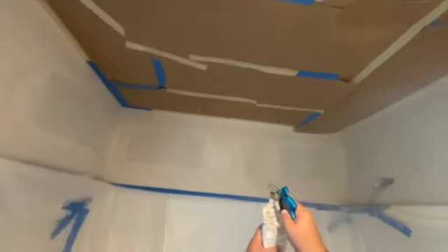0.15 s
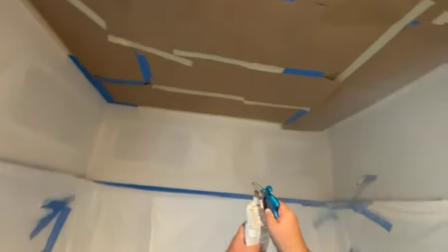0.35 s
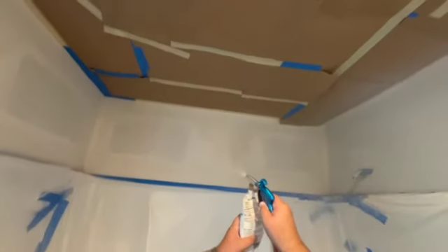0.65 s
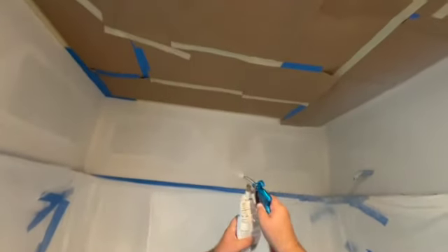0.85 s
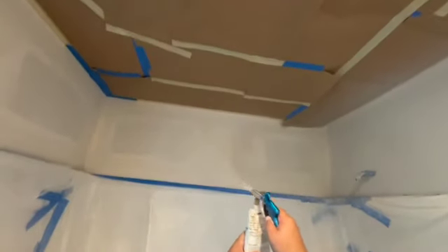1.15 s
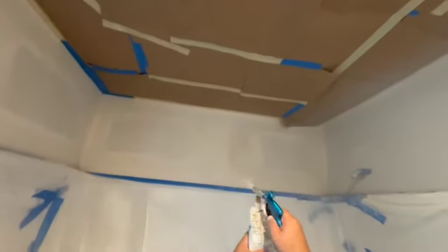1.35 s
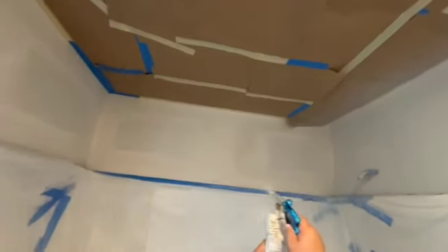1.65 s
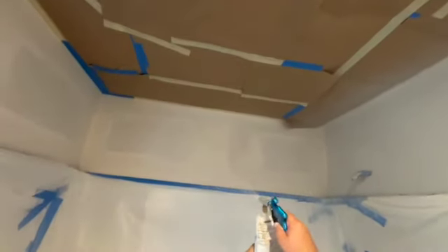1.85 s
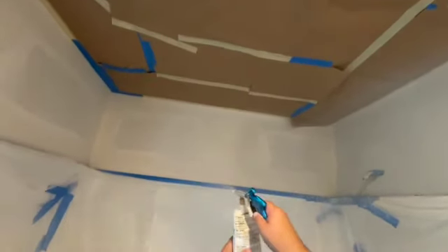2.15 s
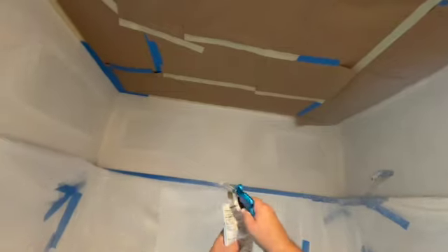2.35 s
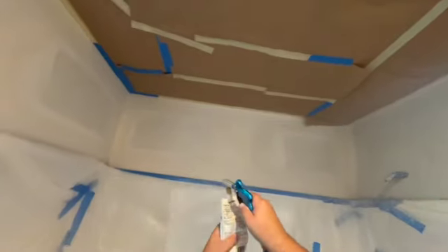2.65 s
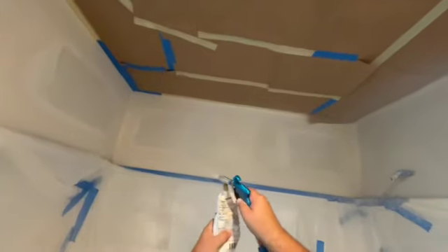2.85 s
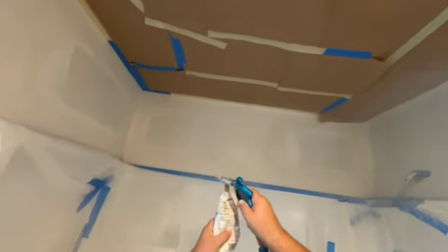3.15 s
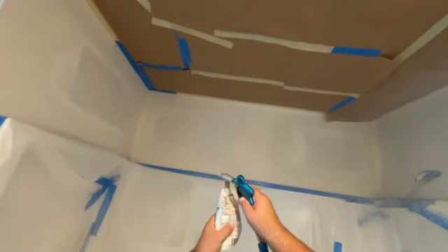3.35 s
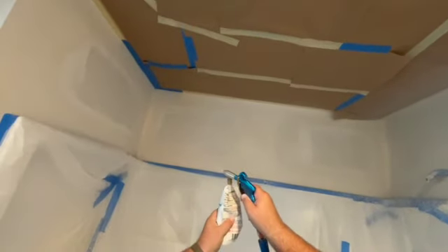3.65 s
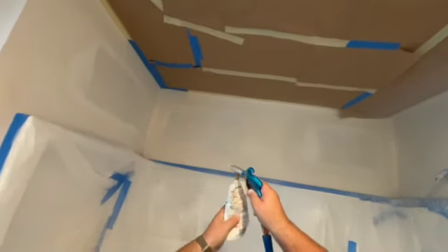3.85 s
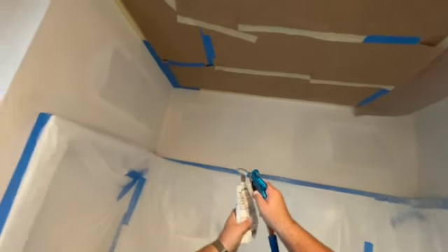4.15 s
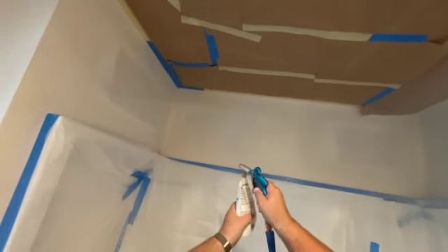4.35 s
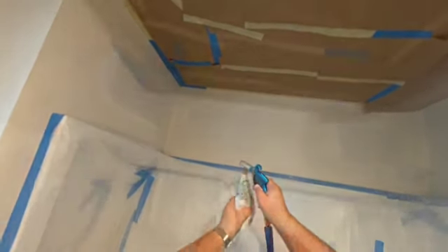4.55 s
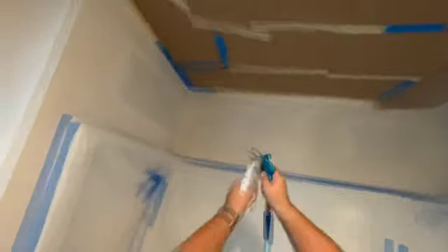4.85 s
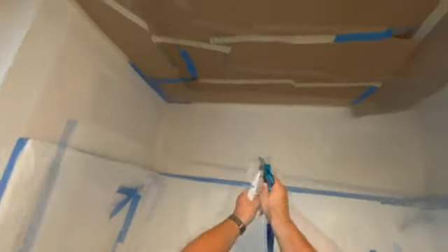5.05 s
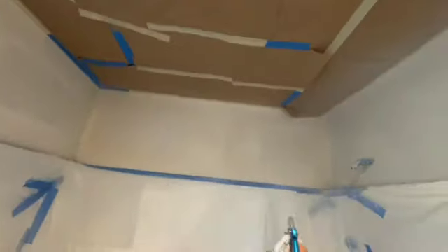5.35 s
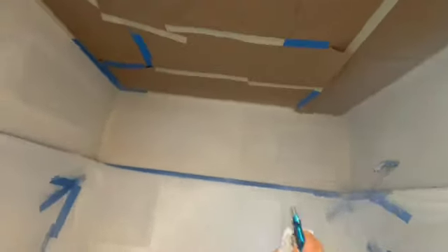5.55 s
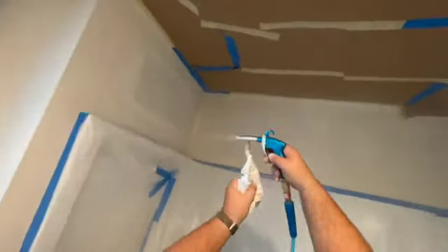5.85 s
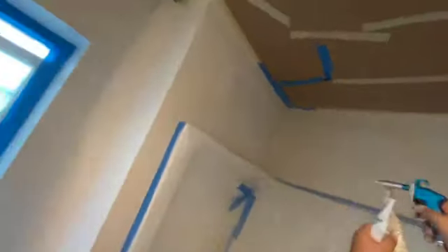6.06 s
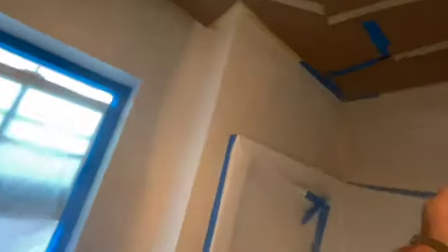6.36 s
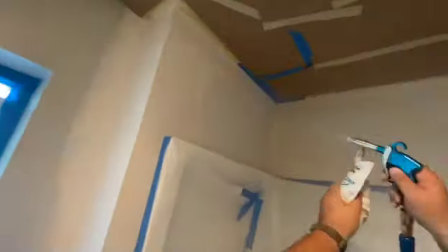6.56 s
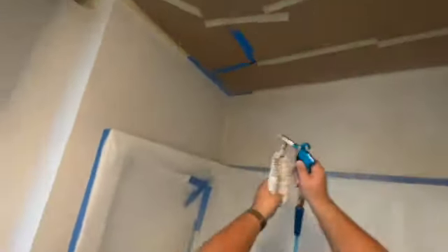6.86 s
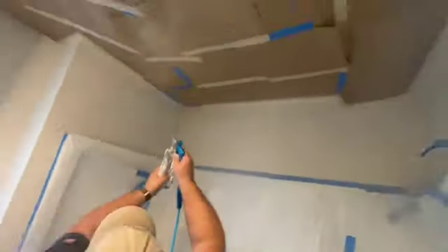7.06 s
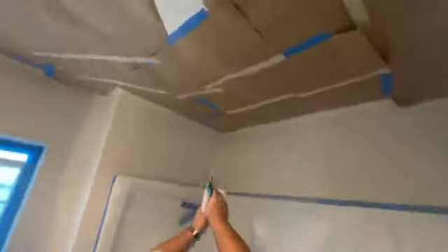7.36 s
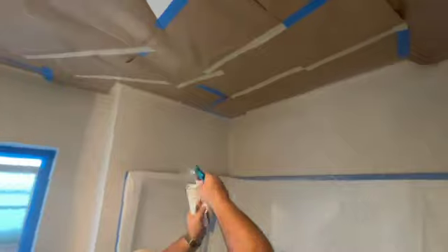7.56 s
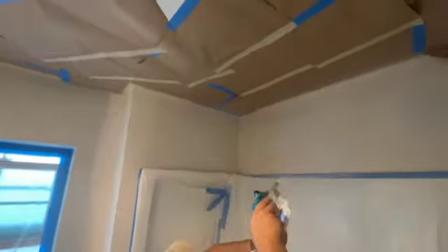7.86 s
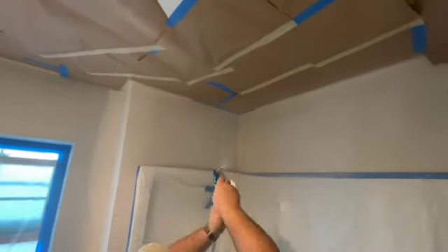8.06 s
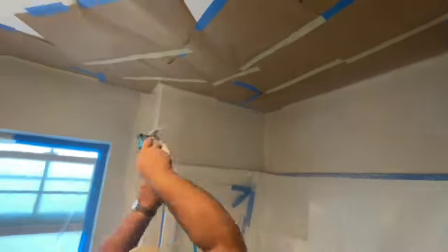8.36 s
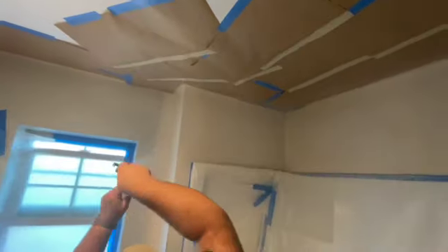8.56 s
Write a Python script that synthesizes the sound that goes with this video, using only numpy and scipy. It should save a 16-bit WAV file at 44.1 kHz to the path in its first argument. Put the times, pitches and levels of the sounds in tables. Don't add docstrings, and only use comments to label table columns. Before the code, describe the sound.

A low throbbing compressor is heard first, with a slight air leak. A spray gun then bursts open close to the microphone, roaring with broad turbulent hiss, fluttering, ringing and crackling with little wet spits. It slowly weakens, then dissolves into a soft time-lapse version: bright airy hiss broken by short pauses over a faint steady whine, which largely stops before the end. Small hard indoor space, wide stereo, automatic level control.

```python
import sys
import numpy as np
from scipy import signal
from scipy.fft import rfft, irfft
from scipy.io import wavfile
from scipy.ndimage import uniform_filter1d

SR = 44100
rng = np.random.default_rng(int(sys.argv[2]) if len(sys.argv) > 2 else 0)


def store_wav(level_fs):
    pcm = np.round(np.clip(np.atleast_2d(level_fs), -1, 1) * 32767)
    wavfile.write(sys.argv[1], SR, pcm.T.astype(np.int16))


def how_loud(loudness_db):
    steps = np.asarray(loudness_db, float) / 20
    return 10 ** steps


N = 384111
HOP, SIZE = 512, 2048
HZ = np.fft.rfftfreq(SIZE, 1 / SR)[:, None]
PASSAGE_SAMPLES = round(5.3 * SR)
S = np.arange(PASSAGE_SAMPLES) / SR
FRAME_S = np.arange(PASSAGE_SAMPLES // HOP + 5) * HOP / SR
TRIGGER_S, FAST_START_S = 0.572, 4.5


def evened(x):
    return x / np.sqrt(np.mean(abs(x) ** 2) + 1e-20)


def wander(count, size):
    return evened(uniform_filter1d(rng.standard_normal(count), size=size))


def drift(size):
    field = rng.standard_normal((len(FRAME_S), len(HZ))).T
    return evened(uniform_filter1d(uniform_filter1d(field, size[0], 0), size[1], 1))


def ramp(t, start, length):
    return np.clip((t - start) / length, 0, 1)


def bumps(rows, t):
    return sum(db * np.exp(-((t - s) / width) ** 2) for s, db, width in rows)


def within(spans, t, margin=0):
    return sum((t > start + margin) & (t < end - margin) for start, end in spans) > 0


def read(points, hz):
    f, value = np.transpose(points)
    return np.interp(np.log(hz + 1), np.log(f + 1), value)


def streaks(depth_db, size):
    gain = how_loud(depth_db * np.minimum(drift(size=size), 1.3))
    return gain / np.sqrt(uniform_filter1d(gain ** 2, size=14, axis=0))


def hiss(mid, side, band_hz, shape_db, side_db, lean, link, streak_db, patch_db, gust_db, tilt_db,
         mid_db=0, size=(2, 26)):
    a, b, c, d = rng.standard_normal((len(FRAME_S), len(HZ), 4)).T
    inside = (HZ > band_hz[0]) & (HZ < band_hz[1])
    mid_gain, side_gain = (how_loud(read(p, HZ)) * (HZ < 15870) for p in (mid, side))
    mid_gain, side_gain = (g / np.sqrt((g[inside] ** 2).sum()) for g in (mid_gain, side_gain))

    tie = lean + link * np.exp(2.5j * drift(size=(4, 140)))
    tie = tie / np.maximum(abs(tie), 1)
    m = a + 1j * b
    s = tie * m + np.sqrt(abs(1 - abs(tie) ** 2)) * (c + 1j * d)

    above_bass = HZ / (HZ + 900)
    gust = gust_db * wander(len(FRAME_S), 2)
    tilt = tilt_db * above_bass * drift(size=(9, 14))
    m = m * mid_gain * how_loud(mid_db + tilt) * streaks(streak_db, size)
    s = s * side_gain * how_loud(side_db - tilt) * streaks(streak_db, size)
    changes_db = above_bass * (gust + patch_db * drift(size=(14, 4)))
    z = np.array([m + s, m - s]) * how_loud(shape_db + changes_db)
    sound = signal.istft(z, nperseg=SIZE, noverlap=SIZE - HOP)[1]
    return sound[:, :len(S)] * np.sqrt(1.5)


def resonate(x, hz, width):
    f = np.fft.rfftfreq(len(x), 1 / SR)
    return evened(irfft(rfft(x) / (1 + (2 * (f - hz) / width) ** 2), len(x)))


def tone(hz, lean_db):
    wave = np.sqrt(2) * np.sin(2 * np.pi * (hz * S + rng.random()))
    return wave * how_loud(np.array([[lean_db], [-lean_db]]))


def ring_db(rings, t):
    lift = 0
    for start, end, hz0, hz1, width, db in rings:
        on = np.clip(np.minimum(t - start, end - t) / 0.07, 0, 1)
        on = on * np.clip(1 + 0.23 * wander(len(t), 6), 0, 2)
        hz = np.interp(t, [start, end], [hz0, hz1])
        lift = lift + db * on / (1 + ((HZ - hz) / width) ** 2)
    return lift


# (f / stroke rate [ratio], level/dB, lean to the left/dB)
PUMP_LINES = [(1, -2, 1.5), (1.5, -18, 7), (1.999, -27, -7), (2.255, -14, -5), (3.25, -27, 6),
              (3.998, -6.5, -2), (5.499, -14.5, -5), (8.25, -18.5, -7)]
# (f/Hz, level/dB per Hz)
PUMP_MID = [(35, -22), (67, -19), (161, -17), (217, 0), (339, -5), (449, -10.5), (600, -12), (815, -17),
            (1000, -13), (2000, -29.5), (3500, -35), (8000, -60), (12500, -65)]
# (f/Hz, level/dB per Hz)
PUMP_SIDE = [(21, -32), (35, -4), (59, 4), (81, -13), (120, 0), (174, -5), (213, -11), (257, -13),
             (441, -8), (728, -10), (3000, -30), (3900, -52), (6600, -120)]
# (f/Hz, width/Hz, level/dB)
ROOM_MODES = [(97.5, 31, -14.5), (208, 27, -16), (245, 33, -15), (284, 22, -12.5), (374, 25, -23),
              (436, 22, -17)]


def compressor():
    stroke_hz = 53.1
    level_db = -32 - 7 * (1 - ramp(S, 0, 0.012))
    level_db = level_db - 18.5 * ramp(S, 0.584, 0.084)
    level_db = level_db - 4 * ramp(S, 1.3, 0.2)
    lines = sum(how_loud(db) * tone(k * stroke_hz, lean_db) for k, db, lean_db in PUMP_LINES)

    stroke = np.cos(2 * np.pi * stroke_hz * S)
    noise = rng.standard_normal(len(S))
    modes = sum(how_loud(db) * resonate(noise, f, w) for f, w, db in ROOM_MODES)
    modes = modes * (1 + 0.3 * stroke) * how_loud([[-1.5], [1.5]])
    rattle = hiss(PUMP_MID, PUMP_SIDE, (60, 3000), shape_db=0, side_db=-2, lean=-0.1, link=0.75,
                  streak_db=0.87, patch_db=0.7, gust_db=0.39, tilt_db=1.4)
    rattle = how_loud(-9.0) * (1 + 0.16 * stroke) * rattle
    return how_loud(level_db) * (lines + modes + rattle)


# (f/Hz, level before 6.9 s/dB, change/dB per s, level after 7.16 s/dB)
WHINE_LINES = [(366.1, -62, 2.5, -78), (829, -69.5, -1.5, -66), (1464, -64.5, 0.2, -67),
               (2024, -75, -1, -90)]
# (f/Hz, level re that whine/dB)
HUM_SIDEBANDS = [(543.7, -7), (636.9, -9), (732.1, -7.5), (1560, -20), (1655, -20), (1739, -9)]


def hurried_compressor():
    shifted = ramp(S + FAST_START_S, 6.9, 0.26)
    levels = []
    for _, db, db_per_s, late_db in WHINE_LINES:
        early_db = db + db_per_s * (S - 0.8)
        levels.append(early_db * (1 - shifted) + late_db * shifted)
    whine = sum(how_loud(db) * tone(line[0], 1.0) for line, db in zip(WHINE_LINES, levels))
    sidebands = sum(how_loud(levels[1] + db) * tone(hz, 0.3) for hz, db in HUM_SIDEBANDS)
    return (whine + sidebands) * np.sqrt(ramp(S, 0.05, 0.5))


# (f/Hz, level/dB per Hz)
FAST_MID = [(24, -41), (40, -8.5), (763, -7), (823, -6.5), (1200, -8.5), (1460, -5), (1580, -6), (2730, -9),
            (3170, -5.5), (5360, -3), (6550, -0.5), (9290, 0), (11300, -2), (13500, 0.5), (15700, -1)]
# (f/Hz, level/dB per Hz)
FAST_SIDE = [(24, -44), (40, -11), (154, -10.5), (823, -9), (1230, -11), (1500, -9.5), (3590, -6),
             (3870, -3), (4180, -4), (4500, -4), (5920, -0.5), (11900, 2), (15700, -2.5)]
# (start t/s, end t/s, start f/Hz, end f/Hz, width/Hz, lift level/dB)
FAST_RINGS = [(4.5, 6.75, 2030, 2000, 85, 4.5), (5.1, 5.9, 5450, 5400, 250, -4.5),
              (5.15, 5.5, 10300, 10300, 300, -5), (5.9, 6.55, 5350, 5350, 220, -14),
              (6.1, 6.5, 11000, 10500, 700, -4), (6.72, 6.88, 10900, 10900, 450, -15),
              (7.0, 7.4, 12300, 11300, 500, -7), (7.45, 7.7, 11100, 11600, 500, -14),
              (7.68, 7.89, 7050, 7200, 200, -22), (8.04, 8.17, 11100, 11100, 500, -20),
              (8.18, 8.27, 11500, 11500, 350, -22), (7.98, 8.09, 7400, 7300, 250, -18),
              (7.68, 7.88, 8800, 8800, 120, -14), (7.7, 7.85, 12900, 12700, 150, -14),
              (7.9, 8.08, 4800, 4800, 200, -8), (8.55, 9, 10900, 10900, 300, -16),
              (7.2, 7.55, 7450, 7450, 150, -6)]
# (t/s, change of flow level/dB, half-width/s)
LULLS = [(5.95, -0.5, 0.16), (6.4, -1.5, 0.14), (6.82, -1.5, 0.41), (7.07, -6, 0.13), (7.46, 1, .025),
         (7.68, 2, .04), (7.76, -0.5, .025), (8.13, 0.5, .025), (8.18, 0.5, .02), (8.31, -3, 0.061),
         (8.34, -2.5, .02), (8.46, -4, 0.067), (8.56, 0, .03)]


def hurried_jet():
    t = FRAME_S + FAST_START_S
    lull_db = bumps(LULLS, t)
    level_db = -40.5 + lull_db
    body_db = -12 - 0.7 * lull_db
    bass_db = -68.5 - level_db
    body = (body_db + 10.0) / (1 + (HZ / 4200) ** 4) / (1 + (600 / (HZ + 1)) ** 4)
    bass = (bass_db + 24.5) / (1 + (HZ / 600) ** 4)
    gaps = (HZ > 2900) & (drift(size=(7, 8)) > 1.25 + 0.45 * (HZ > 6000))
    centre_db = ring_db(FAST_RINGS, t) - 40 * gaps
    air = hiss(FAST_MID, FAST_SIDE, (4000, 15500), level_db + body + bass - 0.2, side_db=0.4, lean=0.16,
               link=0.82, streak_db=2.6, patch_db=1.0, gust_db=1.0, tilt_db=2.65, mid_db=centre_db,
               size=(2, 20))
    return air * ramp(S, 0.05, 0.73)


# (t/s, peak level/dB, length/s, loudest ring f/Hz)
SPITS = [(.579, -17, .018, 1300), (.915, -24, .012, 3100), (1.05, -21, .012, 1430),
         (1.116, -26, .014, 1430), (1.241, -24, .015, 1430), (2.04, -26, .02, 1430),
         (2.217, -29, .01, 1200), (2.417, -29, .01, 1200), (2.476, -27, .012, 1200),
         (2.512, -27, .012, 1200), (2.77, -29, .01, 1430), (2.835, -25, .014, 1200),
         (3.046, -29, .01, 1200), (3.133, -27, .012, 1200), (3.189, -27, .01, 2250),
         (3.213, -26, .012, 2250), (3.257, -26, .011, 1200), (3.285, -28, .01, 2250),
         (3.445, -26, .012, 2250), (3.498, -27, .012, 2250), (3.556, -29, .01, 2250),
         (3.688, -29, .01, 2250), (3.742, -29, .012, 2250), (3.81, -29, .008, 2250),
         (3.97, -27, .012, 2250), (4.031, -29, .01, 1430), (4.077, -27, .012, 2250),
         (4.098, -27, .02, 1430), (4.188, -28, .013, 1430), (4.247, -23, .01, 2250),
         (4.285, -28, .008, 2250), (4.3895, -21, .004, 3100), (4.477, -22.5, .012, 1430),
         (4.536, -19.5, .009, 1430), (4.6135, -21.5, .009, 1430), (4.56, -28, .01, 2250),
         (4.645, -27, .01, 3100), (4.706, -24, .011, 3100), (4.87, -31, .02, 1430), (4.94, -33, .02, 1430)]
# (f/Hz, width/Hz, level/dB)
SPIT_RINGS = [(1200, 130, -6), (1430, 200, -4.5), (2250, 260, -4), (3100, 500, -3)]


def spits():
    s, db, length, hz = np.transpose(SPITS)
    at = np.round(s * SR).astype(int)[:, None] + np.arange(6000)
    u = np.arange(6000) / SR / length[:, None]
    shape = how_loud(db[:, None] - 7.5) * np.minimum(u / 0.15, 1) * np.exp(-u)

    band = signal.butter(2, [1300, 5000], "band", fs=SR, output="sos")
    noise = rng.standard_normal((2, len(S)))
    parts = [(0, 0.38 * evened(signal.sosfilt(band, noise)))]
    for f, w, ring in SPIT_RINGS:
        parts.append((f, how_loud(ring) * np.array([resonate(x, f, w) for x in noise])))

    out = 0
    for f, part in parts:
        favour = how_loud(5 * (abs(hz - f) < 120))
        envelope = np.bincount(at.ravel(), (shape * favour[:, None]).ravel(), len(S))
        out = out + envelope[:len(S)] * part
    near, far = out
    return 0.59 * np.array([near + 0.69 * far, near - 0.5 * far])


# (t/s, level/dB, half-width/s)
LEAK_SWELL = [
    (.33, 3.5, 0.1),
]
# (t/s, change of flow level/dB, half-width/s)
SQUEEZES = [(.77, 2, .025), (.85, -4.5, 0.13), (.9, 1.5, .015), (1.0, 3.5, 0.04), (1.05, 4.5, 0.017),
            (1.33, 2, 0.13), (1.75, 0, 0.13), (2.06, 1, 0.021), (2.59, 0.5, 0.076), (4.14, 2.5, 0.13),
            (4.33, -1.5, 0.053), (4.45, 0.3, 0.042), (4.58, -2, 0.023)]


def flow_db(t):
    shut_db, leak_db, open_s = -65, -48, 0.0095
    leak = shut_db + (leak_db - shut_db) * np.sqrt(ramp(t, 0.11, 0.14))
    leak = leak + bumps(LEAK_SWELL, t) - 11 * np.maximum(t - 0.4, 0)
    leak = leak + 18 * ramp(t, 0.56, 0.008)
    since = np.maximum(t - TRIGGER_S - open_s, 0)
    blast = 6.5 * np.exp(-np.maximum(since - 0.014, 0) / 0.028)
    sag = -10 * (1 - np.exp(-since / 1.76))
    full = -23 + sag + blast + bumps(SQUEEZES, t)
    return leak + (full - leak) * ramp(t, TRIGGER_S, open_s)


# (f/Hz, level/dB per Hz)
JET_MID = [(180, -25), (300, -14), (374, -17), (425, -11.5), (776, -9.5), (1190, -3.5), (1770, -5.5),
           (2310, -2), (2540, -2), (4220, -1.5), (5300, -1.5), (6400, 2), (8400, -4), (10200, -2.5),
           (11100, -2), (13200, -11)]
# (f/Hz, level/dB per Hz)
JET_SIDE = [(180, -47), (300, -17), (337, -24), (572, -11), (1470, -6.5), (1710, -4.5), (1890, -6),
            (2380, -7.5), (3310, -2.5), (5010, -4), (7210, 1), (10000, -5), (11700, -15.5), (14500, -9.5),
            (15700, -14)]
# (f/Hz, link of side to mid [ratio])
JET_LEAN = [(500, 0.16), (3000, -0.12), (6500, 1), (9000, 0.28), (12000, -0.37)]
# (start t/s, end t/s, start f/Hz, end f/Hz, width/Hz, lift level/dB)
RINGS = [(0.5, 1.76, 1150, 1100, 40, 5), (0.5, 2.2, 1500, 1450, 35, 6), (1.95, 3.35, 1180, 1225, 32, 10.5),
         (2.15, 2.8, 2300, 2320, 40, 5), (1.55, 1.95, 1600, 1600, 500, -2),
         (4.27, 4.47, 1750, 1700, 200, -4), (3.5, 5.0, 1374, 1400, 25, 8), (4.27, 4.6, 3400, 3400, 500, -2),
         (.55, .7, 4600, 4600, 500, 2.5), (.55, 1.3, 6500, 6450, 150, 3), (1.23, 2.1, 2180, 2200, 42, 1.5),
         (3.0, 4.35, 2210, 2280, 45, 6.5), (2.1, 3.6, 3300, 3000, 250, -3),
         (.9, 1.6, 10000, 10300, 600, 1.5), (2.3, 4, 9800, 11500, 600, 2), (.75, 1.5, 3100, 3300, 400, 1.5),
         (4.4, 5.2, 1080, 1050, 60, 4), (.65, 1.2, 560, 560, 60, 5), (4.7, 5.1, 1800, 1800, 250, 4)]
# (start t/s, end t/s)
TOP_SPANS = [(.57, .69), (.98, 1.06), (1.4, 1.66), (1.77, 1.85), (1.92, 1.97), (2.02, 2.17), (2.25, 2.34),
             (2.58, 2.65), (2.68, 2.82), (2.9, 3.02), (3.16, 3.2), (3.35, 3.41), (3.67, 3.82), (4.28, 4.48),
             (4.7, 5.3)]
# (start t/s, end t/s)
FULL_SPANS = [(.57, .585), (1.43, 1.455), (3.355, 3.405), (3.695, 3.765), (4.445, 4.48), (4.85, 5.3)]


def jet():
    opened, swing_db = FRAME_S > TRIGGER_S, bumps(SQUEEZES, FRAME_S)
    dry_db = -5 * ramp(FRAME_S, 4.95, 0.09)
    splatter_db = -5 - 0.84 * FRAME_S - 0.48 * swing_db + dry_db
    splatter_db = np.where(opened, splatter_db, 2)
    top_db = np.where(opened, -2.3 + 0.4 * FRAME_S - 0.47 * swing_db, -6)
    low = (splatter_db + 7.5) / (1 + (HZ / 2800) ** 4)
    top = (top_db + 4.0) / (1 + (8500 / (HZ + 1)) ** 8)

    # (f/Hz, level/dB)
    treble = [(11600, -1.0), (12500, -6.5), (13200, -9.5), (13700, -22), (14000, -13), (15100, -13),
              (15300, -0.5), (15800, -17)]
    mid = JET_MID[:-2] + [(16000, JET_MID[-3][1])]
    below_top = HZ < 15150
    mid_db = np.where(within(TOP_SPANS, FRAME_S, 0.012) | below_top, read(treble, HZ), -80)
    broken = ~within(FULL_SPANS, FRAME_S)
    count = len(FRAME_S)
    edge_hz = 13050 + 250 * rng.exponential(1, count // 2 + 1).repeat(2)[:count]
    mid_db = np.where((HZ > edge_hz) & below_top & broken, -80, mid_db)
    hole_limit = np.minimum(2.7, 2.4 - (HZ - 11800) / 750)
    holes = (HZ > 8000) & broken & (drift(size=(6, 6)) > hole_limit)
    mid_db = np.where(holes & below_top, -40, mid_db)
    thin = drift(size=(24, 8)) > np.minimum(1.5, abs(HZ - 11900) / 600 - 0.9)
    side_db = -0.5 - 40 * (thin & (HZ > 10500))

    rings_db = ring_db(RINGS, FRAME_S)
    streak_db = 5.64 * np.clip(1 - rings_db / 7, 0.2, 1)
    streak_db = streak_db * np.where(opened, 1, 0.5)
    air = hiss(
        mid, JET_SIDE, (3000, 9000), low + top + rings_db + 0.5, side_db, lean=read(JET_LEAN, HZ),
        link=0.96, streak_db=streak_db, patch_db=0.49, gust_db=0.3, tilt_db=2.2, mid_db=mid_db)
    flutter = how_loud(0.9 * wander(len(S), 60))
    return air * flutter * how_loud(flow_db(S)) + spits()


def scene():
    mix, start = np.zeros((2, N)), round(FAST_START_S * SR)
    fade_out = np.clip((5.21 - S) / 0.66, 0, 1)
    mix[:, :len(S)] = (compressor() + jet()) * fade_out
    hurried = hurried_compressor() + hurried_jet()
    mix[:, start:] += hurried[:, :N - start]
    return mix


def roll_off(x):
    return signal.sosfilt(signal.butter(12, 15880, fs=SR, output="sos"), x)


def record(dry):
    limited = 0.9 * np.tanh(dry / 0.9)
    low_pass = signal.firwin(255, 15950, window=("kaiser", 9), fs=SR)
    finished = signal.oaconvolve(limited, low_pass[None], "same")
    return roll_off(finished)


dry = scene()
out = record(dry)
store_wav(out)
```